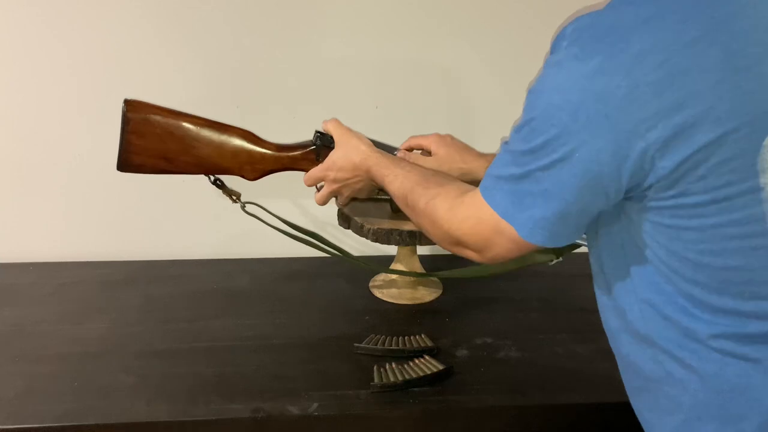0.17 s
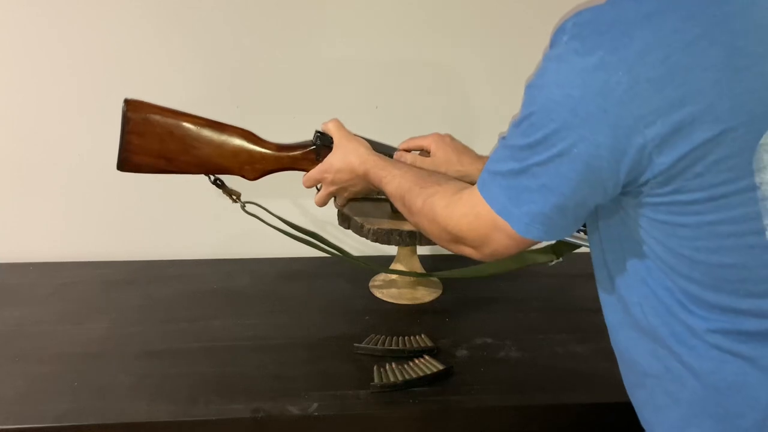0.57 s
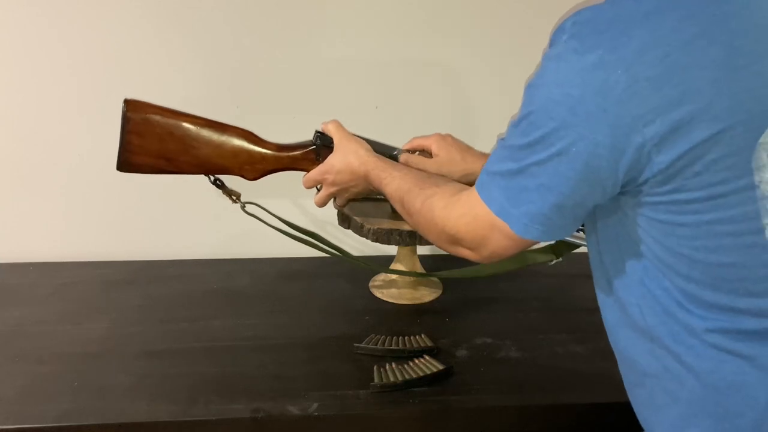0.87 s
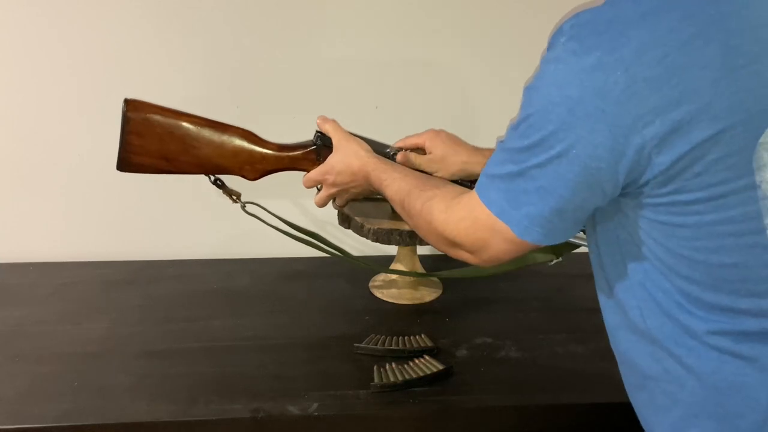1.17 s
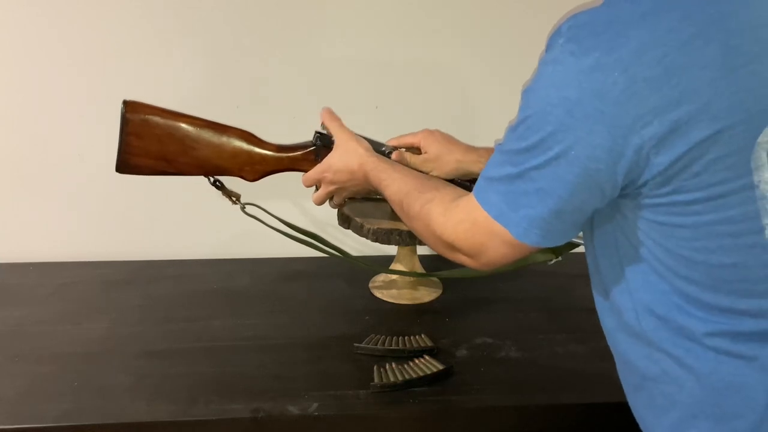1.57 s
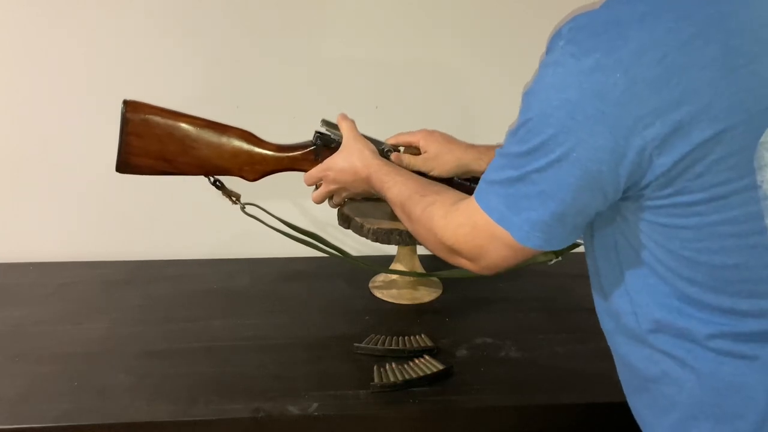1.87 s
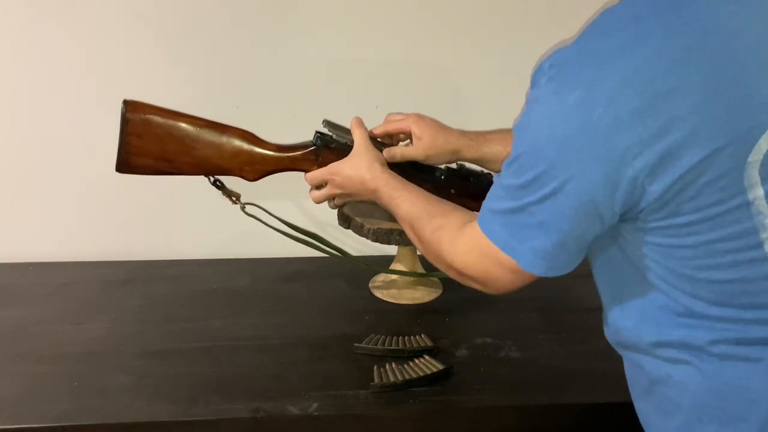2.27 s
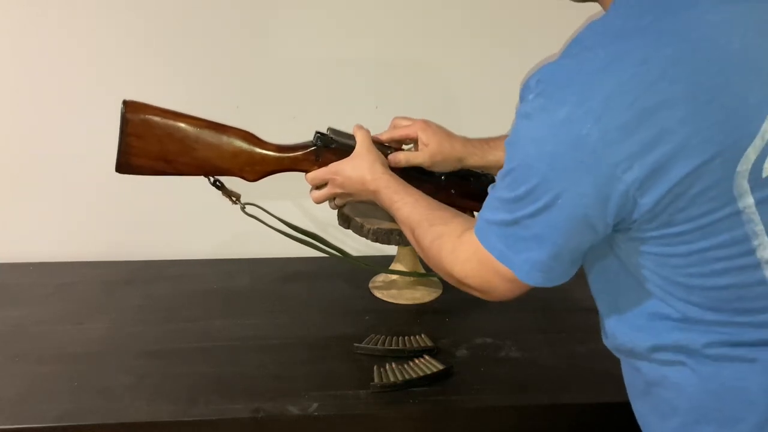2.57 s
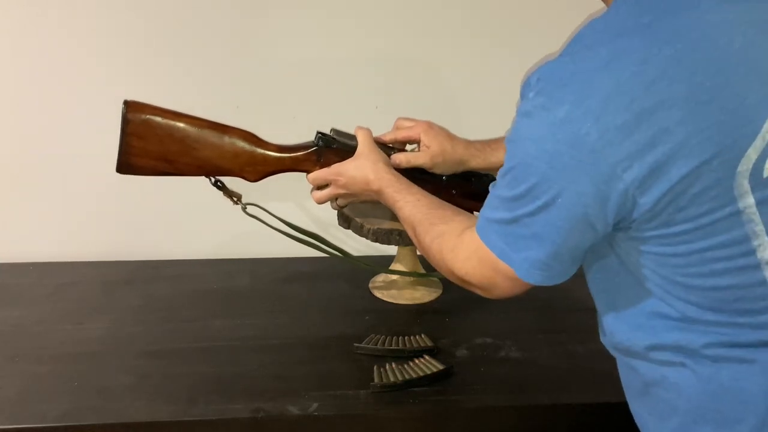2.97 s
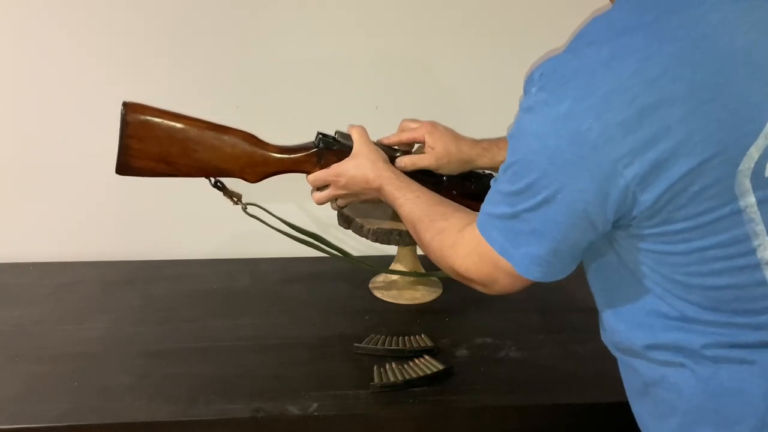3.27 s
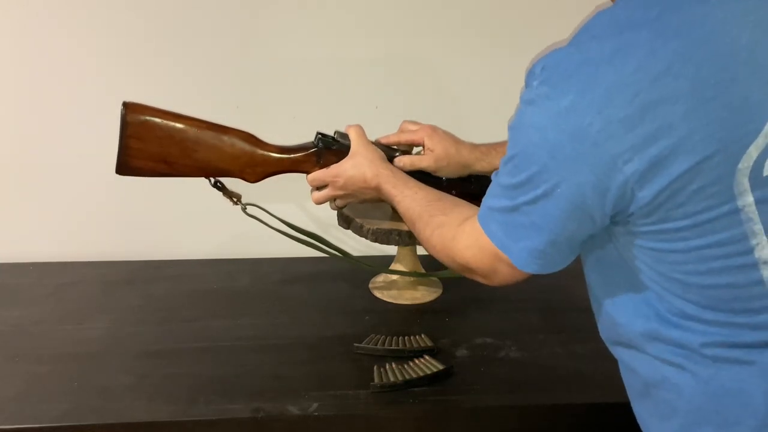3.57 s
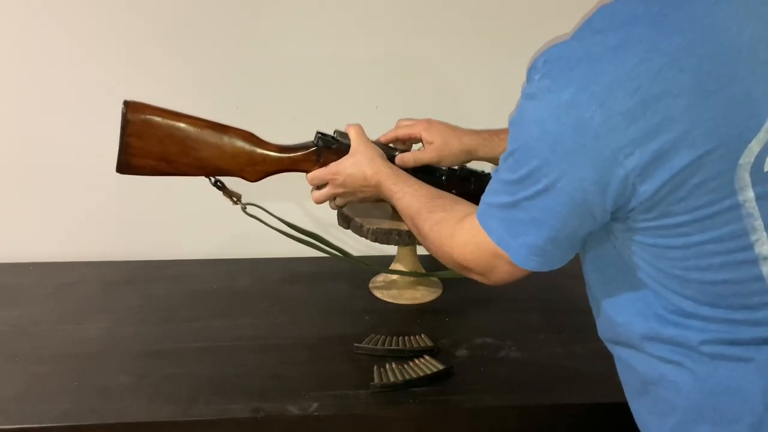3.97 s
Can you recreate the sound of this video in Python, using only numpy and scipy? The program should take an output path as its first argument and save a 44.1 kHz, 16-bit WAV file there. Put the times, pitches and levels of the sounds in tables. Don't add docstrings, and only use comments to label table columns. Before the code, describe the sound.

Sharp steel clicks and clacks cluster, hardest near the middle, as a rifle bolt is seated by hand, with soft rubs and low hum.

```python
import sys
import numpy as np
from scipy import signal
from scipy.fft import rfft, irfft, next_fast_len
from scipy.io import wavfile
from scipy.ndimage import uniform_filter1d

SR = 44100
rng = np.random.default_rng(int(sys.argv[2]) if len(sys.argv) > 2 else 0)


def field_ratio(decibels):
    return 10 ** (np.asarray(decibels, dtype=float) / 20)


def inscribe(sig):
    pcm = np.round(np.clip(np.atleast_2d(sig).T, -1, 1) * 32767)
    wavfile.write(sys.argv[1], SR, pcm.astype(np.int16))


N = 181251


def evened(x):
    return x / np.sqrt(np.mean(x ** 2) + 1e-20)


def read(points, hz):
    f, value = np.transpose(points)
    return np.interp(np.log(hz + 1), np.log(f + 1), value)


def add(mix, start_s, sound):
    part = mix[round(start_s * SR):][:len(sound)]
    part += sound[:len(part)]


def resonate(x, hz, width_hz):
    turn = np.exp(2j * np.pi * np.cumsum(hz * np.ones(len(x))) / SR)
    r = np.exp(-np.pi * width_hz / SR)
    smooth = signal.lfilter([1 - r], [1, -r], x / turn + 1e-18)
    return 2 * (turn * smooth).real


def ring(hz, t60_s, size=6000):
    t = np.arange(size) / SR
    return field_ratio(-60 * t / t60_s) * np.sin(2 * np.pi * hz * t)


def pair(frames, size, likeness):
    a, b, c, d = rng.standard_normal((frames, size // 2 + 1, 4)).T
    same = np.clip(read(likeness, np.fft.rfftfreq(size, 1 / SR)), -1, 1)[:, None]
    left, other = a + 1j * b, c + 1j * d
    return np.array([left, same * left + np.sqrt(1 - same ** 2) * other])


# start in seconds, stock in dB, receiver in dB, edge tick in dB.
CLACKS = [(0.296, -63, -63, -83), (0.302, -54, -93, -87), (.943, -53.5, -55, -78), (1.003, -38, -40, -55),
          (1.009, -40.5, -33.5, -49.5), (1.129, -44, -57.5, -76), (1.134, -35, -40, -60),
          (1.264, -33, -40.5, -70.5), (1.508, -37, -29, -50), (1.514, -29.5, -24.5, -35),
          (1.55, -27.5, -27, -42.5), (1.571, -36, -54, -50), (1.583, -20.5, -20.5, -21.5),
          (1.588, -26.5, -32, -41), (1.636, -26, -26, -46), (1.64, -31, -30, -52.5),
          (1.805, -33, -36.5, -57), (2.183, -55, -45, -74), (2.188, -25, -33.5, -44),
          (2.21, -31, -35.5, -45.5), (2.225, -30.5, -35, -55), (2.256, -34, -42, -65),
          (2.381, -39, -43, -63), (2.42, -43.5, -71, -66), (2.986, -32.5, -37, -48.5),
          (3.812, -41.5, -49.5, -79)]
# start in seconds, bolt in dB, stock in dB, magazine in dB.
CLICKS = [
    (.79, -37, -52, -53.5),
    (2.45, -41.5, -43, -51),
    (2.886, -56.5, -68.5, -80),
    (2.981, -32, -40, -67),
]
# start in seconds, level in dB.
TOUCHES = [
    (0.275, -56),
    (1.447, -67),
    (1.484, -56),
    (2.168, -48),
    (3.302, -81),
]
# stock, magazine, receiver, bolt, edge, each in dB.
TOUCH_PARTS_DB = [-1, -12, -15.5, -18.5, -28]


def contacts():
    rows = []
    for s, stock, receiver, edge in CLACKS:
        bolt = (receiver + edge) / 2
        rows.append((s, stock, stock - 1.5, receiver, bolt, edge))
    for s, bolt, stock, magazine in CLICKS:
        rows.append((s, stock, magazine, bolt - 7.5, bolt, bolt - 5))
    for s, db in TOUCHES:
        rows.append((s, *(db + np.array(TOUCH_PARTS_DB))))
    return sorted(rows)


# frequency in Hz, level in dB, t60 in seconds.
STOCK = [(994, -6, 0.016), (1050, -11, 0.071), (1155, 2.5, 0.004), (1276, 2.5, 0.0097), (1474, -5, 0.0065)]
MAGAZINE = [(1532, 2, 0.01047), (1580, -7.5, 0.0033), (1845, 1.5, 0.031), (2067, 0.5, .012),
            (2480, -11.5, 0.006)]
RECEIVER = [(2500, -10.5, 0.0015), (3070, 3.5, 0.0073), (3138, 3.5, 0.0074), (3800, 2, 0.0025),
            (3534, 1.5, 0.0048), (3820, -2.5, 0.015), (4600, -1.5, 0.0045)]
BOLT = [(5440, -19, 0.0026), (5530, -8.5, 0.0072), (6290, -4.5, 0.0026), (6470, -3.5, 0.0034),
        (7420, -3.5, .003), (8650, -5.5, 0.012), (9315, -4.5, 0.0067)]
EDGE = [(9350, -23.5, .003), (11050, 4.5, 0.0014), (11080, 0, .003), (11500, -18.5, .003),
        (13700, -4.5, 0.0016), (13500, -8.5, .002)]


def hits():
    out, t = np.zeros((2, N)), np.arange(1000) / SR
    for s, *parts_db in contacts():
        light_edge = parts_db[-1] > parts_db[0] > -90 and max(parts_db) < -50
        length_s = .0015 if light_edge else .006
        envelope = np.exp(-(t / length_s) ** 4) * (1 - np.exp(-t / 0.00061))
        chatter = rng.standard_normal(1000) * (rng.random(1000) < .12) * envelope
        chatter[round(.35 * length_s * SR)] = 2.5
        for db, modes in zip(parts_db, (STOCK, MAGAZINE, RECEIVER, BOLT, EDGE)):
            body = np.zeros(1200)
            for hz, mode_db, t60_s in modes:
                level_shift, pitch_shift = rng.standard_normal(2)
                body += field_ratio(mode_db + 2 * level_shift) * ring(hz * (1 + pitch_shift / 50), t60_s, 1200)
            band_hz = [.85 * modes[0][0], 1.1 * modes[-1][0]]
            band = signal.butter(3, band_hz, "band", fs=SR, output="sos")
            sound = signal.sosfilt(band, signal.fftconvolve(chatter, body))
            sound = field_ratio(db + 2.5) * sound / abs(sound).max()
            spread = signal.sosfilt(band, body)
            add(out[0], s - .0017, sound)
            add(out[1], s, spread * np.linalg.norm(sound) / np.linalg.norm(spread))
    return out


# start in seconds, level in dB, frequency in Hz, t60 in seconds.
THUDS = [(0.059, -65, 265.6, 0.11), (0.279, -58, 262, 0.1), (0.806, -51.5, 258, 0.054),
         (1.014, -46.5, 267.4, 0.13), (1.126, -47.5, 249, 0.062), (1.266, -62, 395, 0.26),
         (1.516, -52, 262, 0.2), (1.641, -39, 267, 0.085), (1.812, -48.5, 265, 0.054),
         (2.195, -39, 262.7, 0.064), (2.224, -42, 272.4, 0.08), (2.442, -47, 258, 0.063),
         (2.514, -52, 265, 0.12), (2.763, -62.5, 289.5, 0.07), (2.988, -38.5, 243, 0.031),
         (3.018, -54.5, 369, 0.17), (3.814, -51.5, 256, 0.056)]


def stand_thuds():
    out, t = np.zeros((2, N)), np.arange(6000) / SR
    for s, db, hz, t60_s in THUDS:
        swell = field_ratio(db + 7.0) * (1 - np.exp(-t / 0.0037))
        others = field_ratio(-6.0) * ring(1.42 * hz, .03)
        others += field_ratio(-10.5) * ring(.66 * hz, .04)
        others += field_ratio(-9.0) * ring(1.8 * hz, .02)
        add(out[0], s, swell * (ring(hz, t60_s) + others))
        add(out[1], s, swell * (ring(hz, .025) + 2 * others))
    return out


# start in seconds, level in dB, frequency in Hz, t60 in seconds.
PINGS = [(.790, -50, 3890, .08), (.791, -51, 4080, .06), (.792, -53, 3760, .06), (1.006, -38, 3035, .07),
         (1.007, -45, 2975, .2), (1.134, -45, 3010, .1), (1.584, -28, 3775, .03), (2.212, -42, 3000, .1),
         (2.212, -50, 7300, .03), (2.381, -50, 3000, .07), (2.567, -66, 6050, .03), (2.736, -69, 950, .06),
         (.298, -60, 950, .07), (2.76, -68, 1000, .05), (3.302, -62, 960, .07), (2.986, -36, 830, .04),
         (3.021, -46, 1230, .05), (1.268, -55, 453, .14), (2.19, -36, 2000, .05), (2.211, -36, 1270, .04),
         (2.258, -41, 2030, .06), (2.42, -49, 1990, .05), (1.806, -50, 500, .05), (2.988, -42, 440, .04),
         (1.449, -58, 970, .08)]
# start in seconds, level in dB, frequency in Hz, t60 in seconds.
KNOCKS = [
    (.32, -50, 170, 0.054),
    (0.812, -53, 138.6, 0.09),
    (1.834, -51.5, 129, .12),
    (2.203, -46, 100.4, 0.075),
    (2.993, -51, 157.9, 0.062),
]


def free_rings():
    out, t = np.zeros(N), np.arange(6000) / SR
    for s, db, hz, t60_s in PINGS + KNOCKS:
        add(out, s, field_ratio(db) * ring(hz, t60_s) * (1 - np.exp(-t / 0.0013)))
    return out


def stroke(length_s, first_db, last_db):
    grains, lumps = rng.standard_normal((2, SR // 4))[:, :round(length_s * SR)]
    lumpiness = field_ratio(3.0 * evened(uniform_filter1d(lumps, 200)))
    grit = grains * lumpiness * signal.windows.tukey(len(grains), .2)
    return grit, field_ratio(np.linspace(first_db, last_db, len(grit)))


# start in seconds, length in seconds, first level in dB, last level in dB, centre in Hz.
RUBS = [(.15, 0.18, -66.5, -72, 1600), (1.03, 0.098, -51.5, -43.5, 1830), (1.16, 0.12, -61, -53, 1700),
        (1.29, 0.12, -44.5, -79, 1750), (1.445, 0.14, -73, -30, 1190), (2.26, .11, -36, -78, 1610),
        (2.39, 0.16, -41, -92, 1684), (2.88, .1, -75, -48.5, 1198), (3.17, .08, -77.5, -95, 1303),
        (3.7, 0.12, -71.5, -68.5, 1662), (4.06, 0.087, -82, -58, 1707)]
# start in seconds, length in seconds, first level in dB, last level in dB, centre in Hz.
SHIFTS = [(.265, 0.19, -56, -101, 283), (2.5, 0.11, -53.5, -86, 279.4), (2.74, 0.076, -72.5, -75, 283.4),
          (3.15, 0.13, -67.5, -72, 296.7), (3.29, 0.14, -59.5, -79, 454), (3.5, 0.22, -75, -83, 552),
          (.79, .06, -58, -67.5, 316), (1.265, 0.09, -46, -71, 400), (1.51, 0.14, -46, -49.5, 340),
          (1.65, 0.1, -50.5, -57.5, 327), (2.25, .16, -50.5, -62, 350), (3.815, 0.054, -53, -73, 347.5)]
# start in seconds, length in seconds, first level in dB, last level in dB.
SLIDES = [
    (0.517, 0.069, -73, -63.5),
    (0.575, 0.097, -65.5, -88),
    (1.522, 0.042, -48, -37.5),
    (2.232, 0.083, -46, -74),
    (2.907, .077, -76, -60.5),
]
# frequency in Hz, density in dB per Hz.
SLIDE_COLOUR = [(700, -30), (1500, 5), (3500, 5.5), (5500, -2), (9000, -2.5), (10500, -6.5), (12500, -15.5),
                (14500, -24.5)]


def friction():
    out = np.zeros(N)
    for rows, db, width_hz in ((RUBS, -7.5, 1100), (SHIFTS, -6.5, 450)):
        for s, *shape, hz in rows:
            grit, level = stroke(*shape)
            dull = resonate(resonate(grit, hz, width_hz), hz, width_hz)
            add(out, s, field_ratio(db) * level * evened(dull))
    for s, *shape in SLIDES:
        grit, level = stroke(*shape)
        colour = field_ratio(read(SLIDE_COLOUR, np.fft.rfftfreq(len(grit), 1 / SR)))
        bright = irfft(rfft(grit) * colour, len(grit))
        add(out, s, field_ratio(-3.0) * level * evened(bright))
    return out


# delay in ms, level in dB.
ECHOES = [(1.3, -9), (2.4, -11), (3.9, -9), (5.2, -10), (6.9, -12), (12, -15), (17, -15)]
# frequency in Hz, t60 in seconds.
ROOM_T60 = [(200, 0.61), (530, 0.35), (1390, 0.37), (3680, 0.4), (9700, 0.27)]
# frequency in Hz, gain in dB.
ROOM_GAIN = [(200, 2), (700, -1), (1000, -4.5), (4000, -6.5), (7000, -6), (12000, -11)]
# frequency in Hz, likeness from 0 to 1.
ROOM_SAME = [(200, 1), (1000, 0.11), (3000, 0.055), (6000, 1), (8000, 1), (15000, 0.93)]


def room(near, spread):
    early, t = np.zeros(1200), np.arange(N) / SR
    early[0] = 1
    for k, (ms, db) in enumerate(ECHOES):
        early[round(ms * SR / 1000)] = field_ratio(db) * (-1) ** (k + 1)
    early /= np.linalg.norm(early)
    out = np.tile(signal.oaconvolve(near, early)[:N], (2, 1))
    hz, age_s = np.fft.rfftfreq(512, 1 / SR), np.arange(300) * 128 / SR
    decay = field_ratio(-60 * age_s / read(ROOM_T60, hz)[:, None])
    onset = np.clip((age_s - .008) / .012, 0, 1)
    gain = field_ratio(read(ROOM_GAIN, hz))[:, None]
    for k in range(3):
        z = pair(300, 512, ROOM_SAME) * decay * onset
        z *= gain / np.linalg.norm(z[0], axis=1, keepdims=True)
        tail = signal.istft(z, nperseg=512, noverlap=384)[1][:, 128:]
        tail /= np.linalg.norm(tail[0])
        share = np.sqrt(2 / 3) * np.cos(2 * np.pi * 1.316 * t + k * np.pi / 3)
        out += field_ratio(-5.0) * signal.fftconvolve((share * spread)[None], tail, axes=1)[:, :N]
    return out


# frequency in Hz, density in dB per Hz.
FLOOR = [(15, -22.5), (25, -6), (131, -8.5), (286, -20), (600, -27.5), (1500, -37.5), (3000, -48),
         (6000, -52)]
# frequency in Hz, density in dB per Hz.
HISS = [(300, -41), (2000, -41), (6900, -46.5), (9270, -44.5), (11500, -45.5), (15000, -63)]
# frequency in Hz, likeness from 0 to 1.
SAME = [(60, 0.23), (300, 0.55), (1000, 0.12), (3000, 0.14), (6000, 0.43), (8000, 0.97), (15000, 1)]
# frequency in Hz, width in Hz, level in dB.
HUM = [(45, 16, 3), (104.6, 18, -6.5), (157, 25, -16.5)]
# time in seconds, level in dB.
RUMBLE = [(0.0, -69), (0.12, -64), (1.68, -60), (2.11, -69), (3.23, -60.5), (3.67, -63), (3.72, -75),
          (3.9, -61), (4.11, -70)]


def background():
    hz = np.fft.rfftfreq(2048, 1 / SR)
    colour = np.hypot(field_ratio(read(FLOOR, hz)), field_ratio(read(HISS, hz)))[:, None]
    z = pair(N // 512 + 5, 2048, SAME) * colour
    air = field_ratio(-66.5) * evened(signal.istft(z, nperseg=2048, noverlap=1536)[1][:, :N])
    low_cut = signal.butter(4, 36, "high", fs=SR, output="sos")
    shake = signal.sosfilt(low_cut, rng.standard_normal(N))
    hum = np.zeros(N)
    for f, width_hz, db in HUM:
        hum += field_ratio(db) * evened(resonate(resonate(shake, f, width_hz), f, width_hz))
    hum = evened(hum)
    hum /= np.sqrt(uniform_filter1d(hum ** 2, 14000) + 0.038)
    swell_db = np.interp(np.arange(N) / SR, *np.transpose(RUMBLE))
    return air + field_ratio(swell_db + 3.5) * hum


def scene():
    near, spread = hits() + friction()
    free = free_rings()
    ringing, thumps = stand_thuds() + free
    return room(near, spread + field_ratio(-1.0) * thumps) + field_ratio(5.0) * ringing + background()


# frequency in Hz, left minus right in dB.
LEFT_MORE = [(100, -1), (500, 1.5), (1500, 2), (4000, 1.15), (12000, -1)]
# frequency in Hz, left lead in radians.
LEFT_LEADS = [(0, 0), (2700, 1.2), (5700, 1.6), (7500, -.6), (9150, -3.14), (11100, -5.9), (13600, -9.42),
              (16200, -12.8)]


def microphone(dry):
    size = next_fast_len(N + 4096)
    hz = np.fft.rfftfreq(size, 1 / SR)
    lean = field_ratio(read(LEFT_MORE, hz) / 2)
    lead = np.exp(.5j * np.interp(hz, *np.transpose(LEFT_LEADS)))
    low_cut = (hz / 36) ** 3 / np.sqrt(1 + (hz / 36) ** 6)
    ports = (hz < 16400) * low_cut * np.array([lean * lead, 1 / (lean * lead)])
    return irfft(rfft(dry, size) * ports, size)[:, :N]


def top_cut(x):
    return signal.sosfilt(signal.butter(12, 16650, fs=SR, output="sos"), x)


def record(dry):
    mix = microphone(dry)
    return top_cut(mix)


dry = scene()
out = record(dry)
inscribe(out)
```